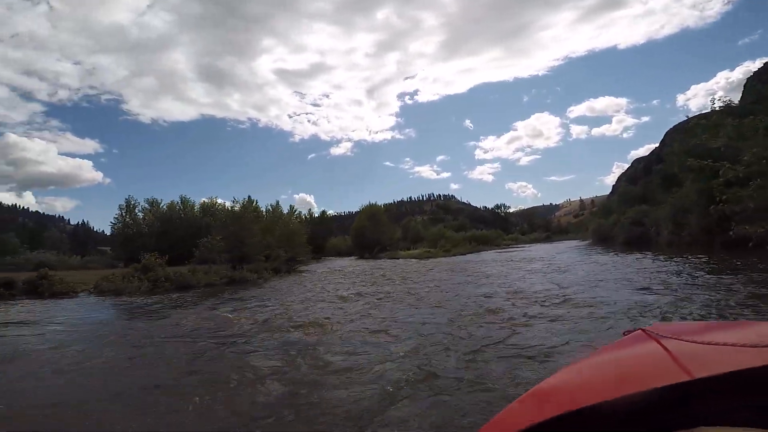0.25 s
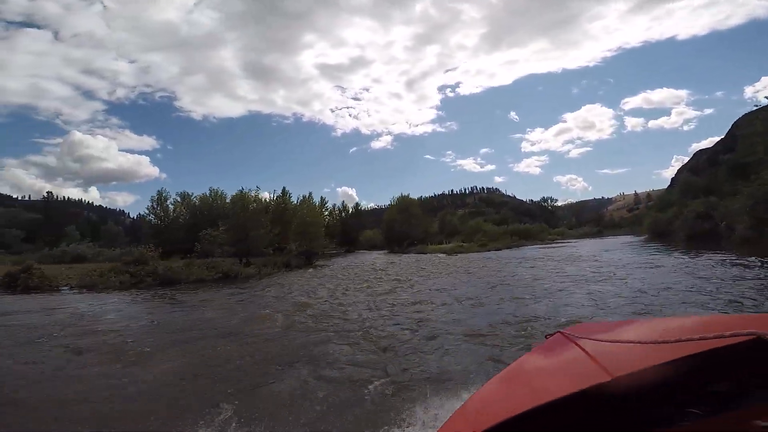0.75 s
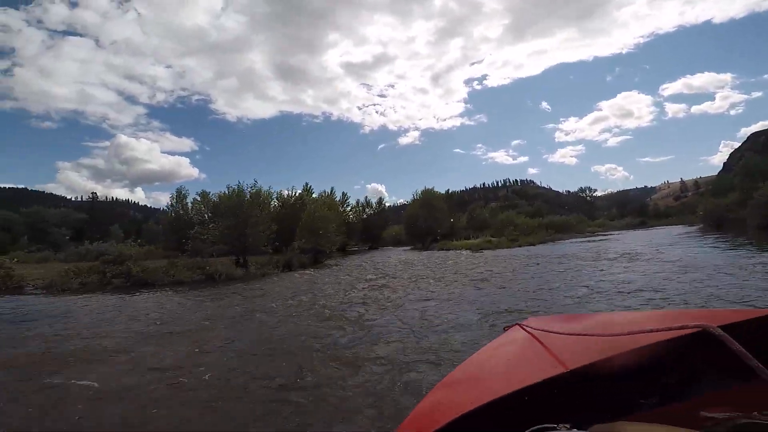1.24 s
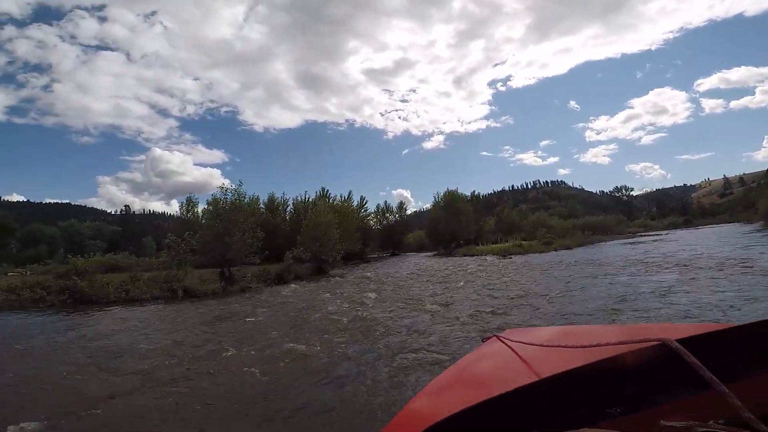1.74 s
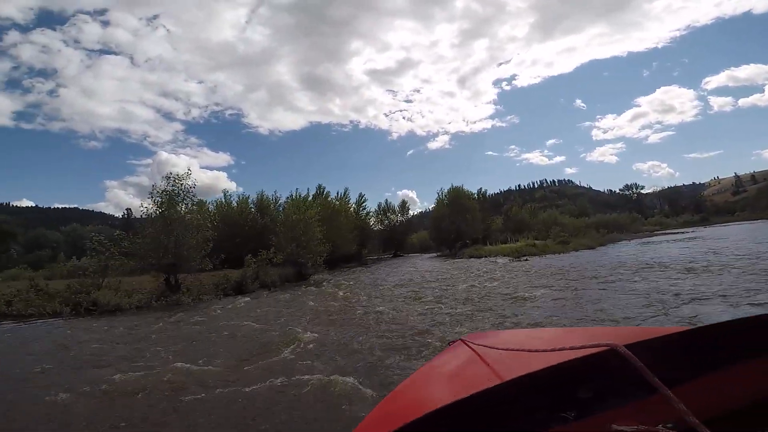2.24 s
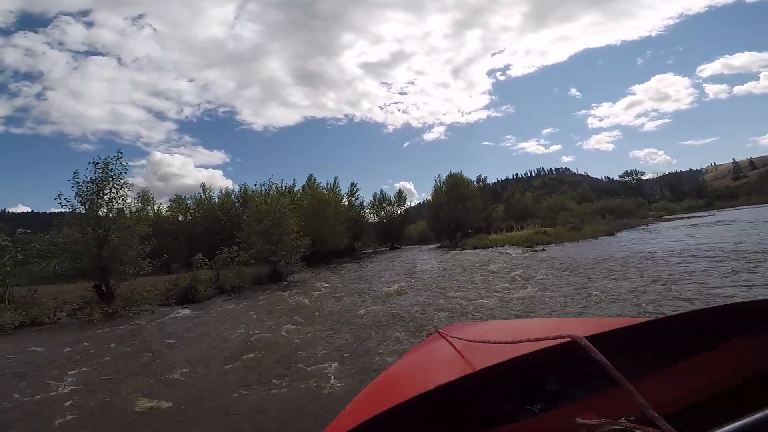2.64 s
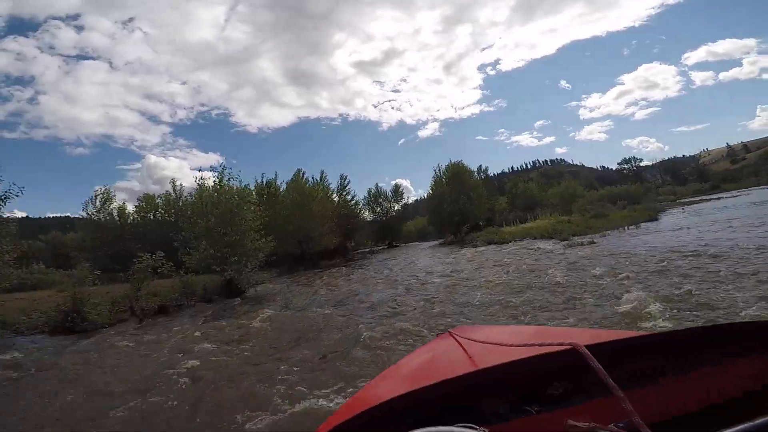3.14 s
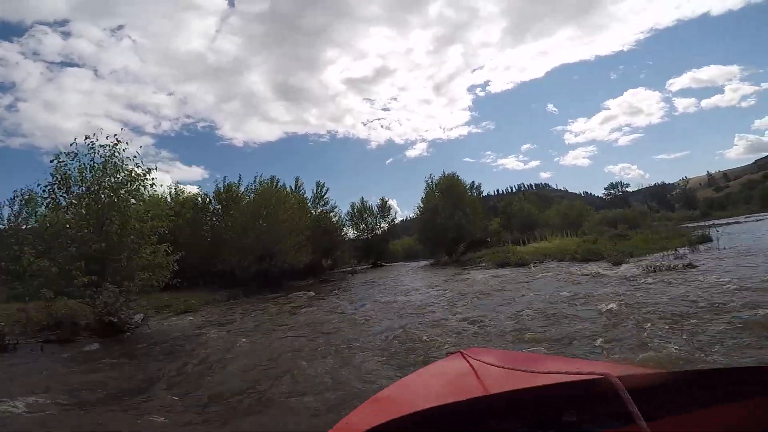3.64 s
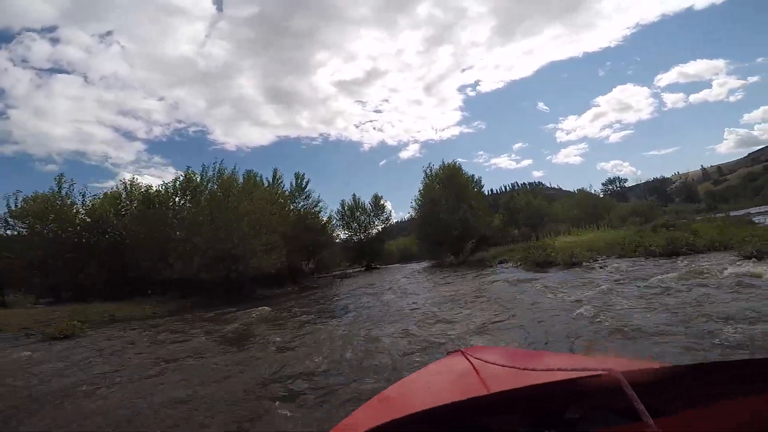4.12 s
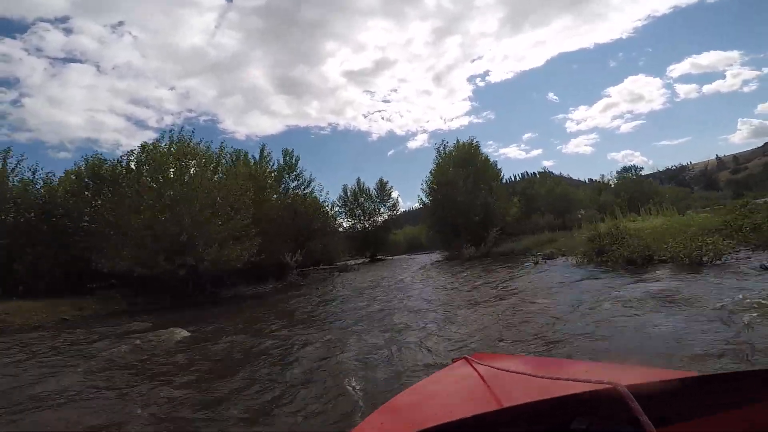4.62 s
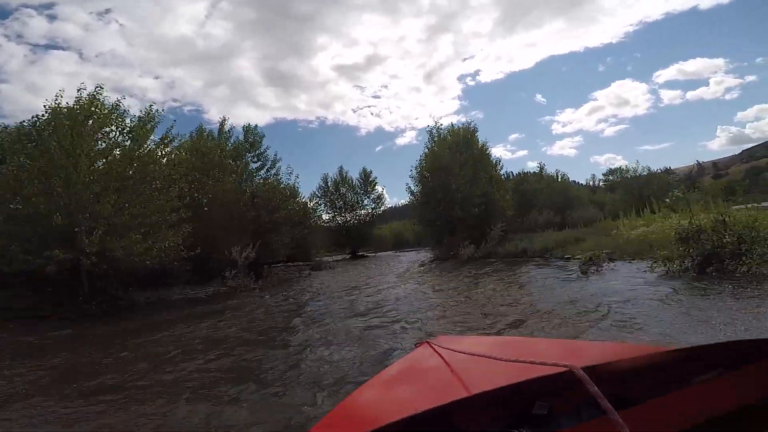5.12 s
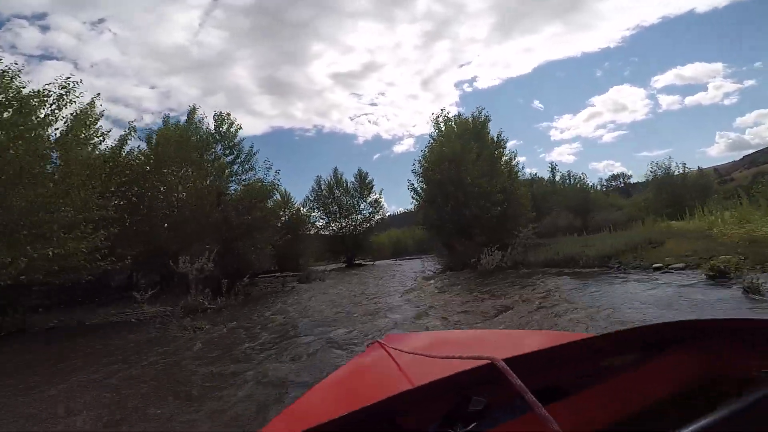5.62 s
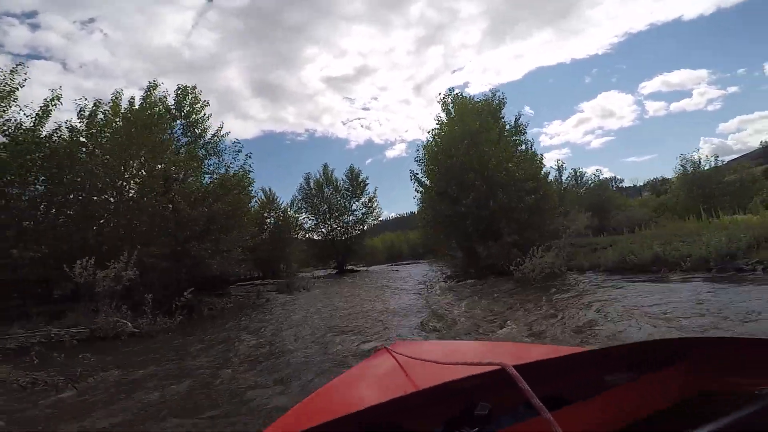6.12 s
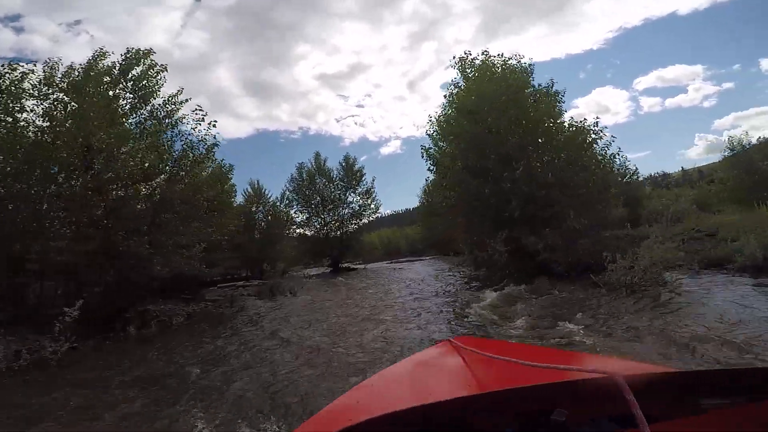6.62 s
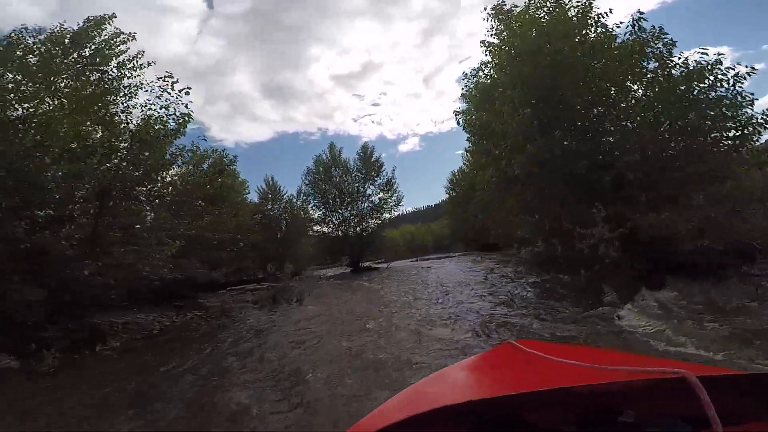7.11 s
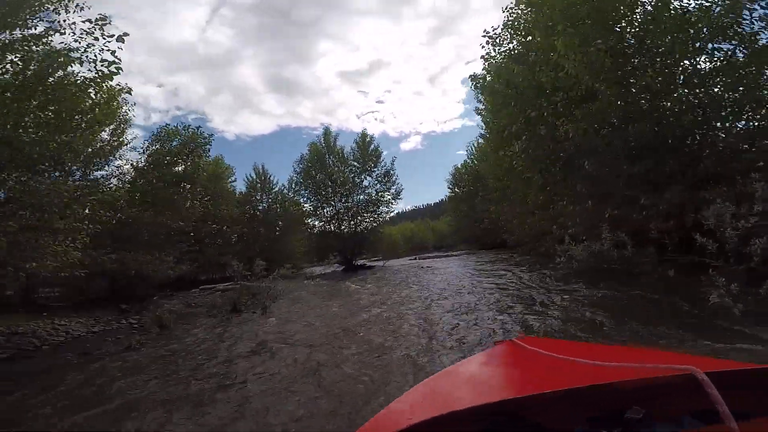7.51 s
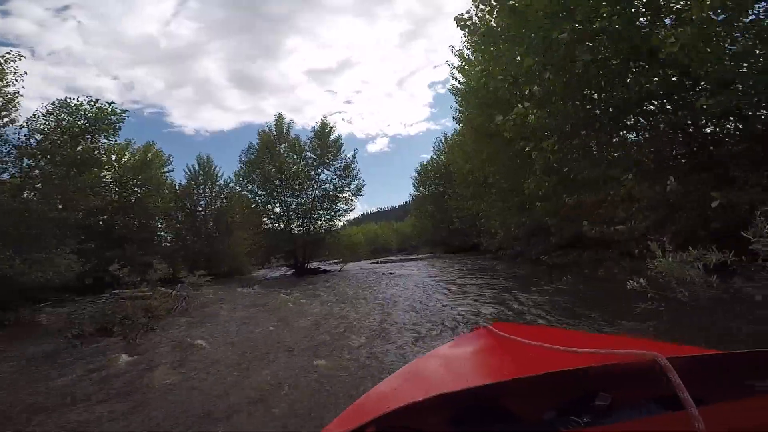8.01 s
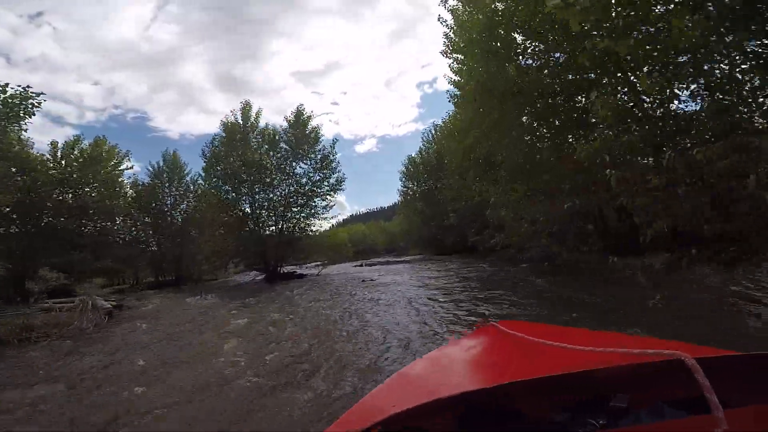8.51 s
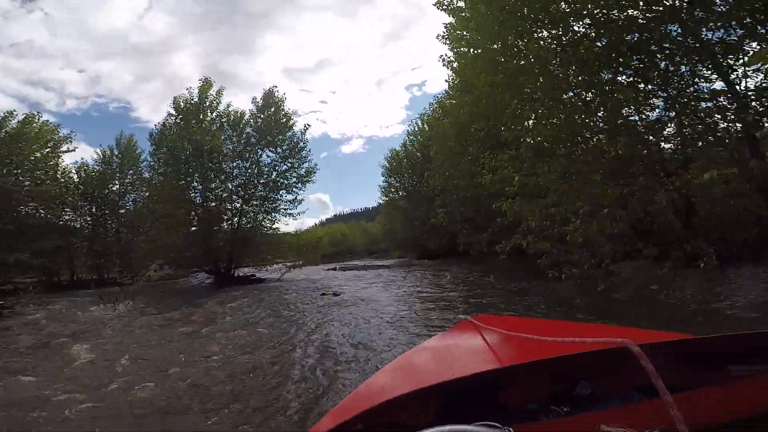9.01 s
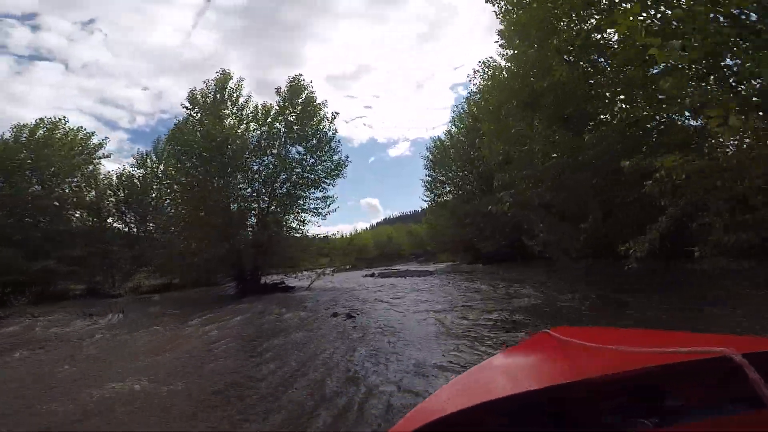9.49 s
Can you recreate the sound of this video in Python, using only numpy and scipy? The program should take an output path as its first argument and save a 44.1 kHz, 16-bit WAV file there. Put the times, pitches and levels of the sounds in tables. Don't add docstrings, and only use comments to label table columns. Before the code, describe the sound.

A small jet boat engine growls and whines with its throttle pumped up and down, over hull rumble, hissing spray, wind buffeting and a few wave thumps.

```python
import sys
import numpy as np
from scipy import signal
from scipy.fft import rfft, irfft, dct, next_fast_len
from scipy.io import wavfile
from scipy.ndimage import uniform_filter1d, minimum_filter1d

SR = 44100
rng = np.random.default_rng(int(sys.argv[2]) if len(sys.argv) > 2 else 0)


def boost_factor(decibels):
    exponent = np.asarray(decibels, float) / 20
    return 10 ** exponent


def put_to_file(sound):
    columns = np.atleast_2d(sound).T
    safe = np.clip(columns, -1, 1)
    whole_steps = np.round(safe * 32767)
    wavfile.write(sys.argv[1], SR, whole_steps.astype(np.int16))


N = 429960
TIME = np.arange(N) / SR
SIZE = next_fast_len(N)
HZ = np.fft.rfftfreq(SIZE, 1 / SR) + 1e-3


def rms_one(x):
    return x / np.sqrt(np.mean(x ** 2) + 1e-20)


def in_time(rows):
    return np.interp(TIME, *np.transpose(rows))


def at_hz(points, hz):
    f, value = np.transpose(points)
    return np.interp(np.log(hz), np.log(np.maximum(f, 1)), value)


def drift(rate):
    r = np.exp(-80 * np.pi * rate / SR)
    white = rng.standard_normal(N // 40 + 2002)
    slow = signal.lfilter([1], [1, -2 * r, r * r], white)[2000:]
    return np.interp(np.arange(N) / 40, np.arange(len(slow)), rms_one(slow))


def resonate(x, hz, width):
    r = np.exp(-np.pi * width / SR)
    top = np.array([1, 0, -1]) * (1 - r * r) / 2
    return signal.lfilter(top, [1, -2 * r * np.cos(2 * np.pi * hz / SR), r * r], x)


def patchy_noise(spectrum, patchy_db, rate, count):
    coloured = rfft(rng.standard_normal((3, SIZE))) * boost_factor(at_hz(spectrum, HZ))
    place = np.interp(np.log(HZ), np.log([spectrum[1][0], spectrum[-2][0]]), [0, count - 1])
    out, together = 0, drift(rate / 3)
    for k in range(count):
        band = np.sqrt(np.clip(1 - np.abs(place - k), 0, 1))
        flicker = boost_factor(patchy_db * (0.22 * together + drift(rate)))
        out = out + flicker * irfft(coloured * band, SIZE)[:, :N]
    return rms_one(out)


def swells(s, size, rise_s, fall_s):
    coarse = TIME[::40]
    gap = coarse[:, None] - s
    humps = np.exp(np.where(gap < 0, gap / rise_s, -gap / fall_s))
    return np.interp(TIME, coarse, humps @ size)


def lag(steps, seconds, start):
    r = np.exp(-1 / (seconds * SR))
    return start + signal.sosfilt([[1 - r, 0, 0, 1, -r, 0]] * 2, steps - start)


# start in seconds, firings per second the engine heads for.
THROTTLE = [(0, 142.7), (.25, 125), (.51, 148.1), (.74, 164.7), (1.21, 160.4), (1.62, 156.2), (2.08, 127.7),
            (2.36, 159.1), (2.54, 173.4), (2.82, 183.7), (3.18, 170.8), (3.41, 108.1), (3.7, 122.8),
            (4.22, 93.7), (4.51, 82.7), (4.85, 89.9), (5.08, 125.7), (6.18, 95.5), (6.54, 129.6),
            (6.74, 147.2), (7.02, 62.5), (7.52, 142), (7.78, 131), (8.0, 94), (8.31, 142.4), (8.56, 168.7),
            (8.96, 67.1), (9.46, 127.4)]
# load in dB, churn of water at the outlet in dB.
EFFORT = [(-2.5, 5.5), (-1.5, 1), (3, 1.8), (0, -2), (-3.5, -8), (-2, -2.5), (1.1, 0), (0.5, 2.5),
          (0, -0.5), (-1, -1), (-2, 5.5), (0.5, 4.5), (1, .1), (2.2, 4), (-5.5, -1.7), (-1, 1), (2, 1),
          (2.3, 2.9), (2, .1), (1, -1), (-2, -0.3), (3, 6.5), (-1, 4), (3, 1), (3, 1), (-1.5, 2.5), (-5, 0),
          (4, 5)]
START_PER_S, FLYWHEEL_S, LOAD_S = 70.6, .0877, 0.048


def throttle():
    s, aim = np.transpose(THROTTLE)
    load_db, churn_db = np.transpose(EFFORT)
    move = np.searchsorted(s, TIME, "right") - 1
    per_s = lag(aim[move], FLYWHEEL_S, START_PER_S)
    return per_s, lag(load_db[move], LOAD_S, load_db[0]), lag(churn_db[move], LOAD_S, churn_db[0])


# pitch in Hz, width in Hz, rms level in dB, sign.
EXHAUST = [(63, 58.5, -20, 1), (166.6, 30.7, -12.5, 1), (217.5, 17, -18.5, 1), (257.4, 16.1, -13, 1),
           (322.2, 6, -9, -1), (354.8, 18.3, -9.5, 1), (395, 10.4, -15, 1), (446.5, 86, -13.5, 1),
           (483.2, 16, -11.5, -1), (500.8, 4.8, -8.5, -1), (556.7, 28.4, -9, 1)]
MUFFLER_HZ = 461


def exhaust_gain(hz):
    grid = np.arange(20., 1000.)
    modes = 0
    for top_hz, width, db, sign in EXHAUST:
        modes = modes + np.sign(sign) * boost_factor(db) / (1 + 1j * (grid - top_hz ** 2 / grid) / width)
    muffler = np.sqrt(1 + (grid / MUFFLER_HZ) ** 12)
    return np.interp(hz, grid, np.abs(modes) / muffler)


ORDER_DB = [3.17, 0.66, -3, -5.5]
# multiple of firing rate, level against the rasp in dB.
WEAK_ORDERS = [(.5, 0), (1.5, 3.5), (2.5, 0.5), (3.5, -5.5), (4.5, -5.5), (5, -1), (5.5, -7.5), (6, -3.5),
               (6.5, -10), (7, -4.5), (7.5, -8.5), (8, -5), (8.5, -12), (9, -5), (10, -10.5)]
# frequency in Hz, level in dB.
PIPE = [(40, 1), (70, 1), (100, -5), (250, -4.5), (480, -8), (620, -5), (900, -7), (1150, -9), (1500, -16)]
FLUTTER_DB, UNEVEN_LOSS_DB = .5, 0.91


def engine(per_s, load_db, rasp_db, rumble_db):
    phase = 2 * np.pi * np.cumsum(per_s) / SR + 0.0073 * drift(28)
    rough = np.interp(rumble_db, [-32, -17], [.6, 3])
    rough = rough + np.clip(-np.gradient(per_s) * SR / 70, 0, 3)
    out = 0
    for k, level_db in enumerate(ORDER_DB, 1):
        flutter_db = rough * (FLUTTER_DB * drift(12.0) - UNEVEN_LOSS_DB)
        gain = np.sqrt(2) * exhaust_gain(k * per_s) * boost_factor(level_db + load_db + flutter_db)
        out = out - gain * np.cos(k * phase + 0.33 * rough * drift(5.35))
    for order, level_db in WEAK_ORDERS:
        gain = boost_factor(rasp_db + level_db + at_hz(PIPE, order * per_s) + 4.77 * drift(3.6))
        waver = 0.047 * rough ** 2 * np.sqrt(order) * drift(11)
        out = out + gain * np.cos(order * phase + waver + order ** 2)
    return 1.234 * out + 0.55 * hull_hold(out), phase


# pitch in Hz, width in Hz, level in dB.
HULL = [(70, 14, -12.5), (167.2, 49, 2), (258, 22, -2.5), (338.6, 45, -2), (409, 5.3, 1), (448.8, 14, 2.5)]


def hull_hold(tones):
    return sum((-1) ** k * resonate(tones, hz, 0.089 * width) for k, (hz, width, db) in enumerate(HULL))


def rumble(level_db):
    white = rng.standard_normal((3, N))
    rung = sum((-1) ** k * boost_factor(db) * resonate(white, hz, width) for k, (hz, width, db) in enumerate(HULL))
    low = signal.butter(4, 540, fs=SR, output="sos")
    return boost_factor(level_db) * rms_one(signal.sosfilt(low, rung))


# frequency in Hz, level in dB per Hz.
RASP = [(330, -35.5), (560, -9), (658, -10), (822, -9), (922, -11.5), (1150, -10.5), (1330, -13.5),
        (2800, -27), (3640, -46.5), (6160, -120)]
# pitch in Hz, width in Hz, level in dB.
COVERS = [(579, 29, 2.5), (826, 19, 4), (1003, 11, 5)]
# pitch in Hz, width in Hz.
PANEL = (1130, 26)


def rasp(level_db, panel_db, phase):
    puffs = patchy_noise(RASP, patchy_db=2.64, rate=1.8, count=4) * (1 + 0.095 * np.cos(phase))
    panel = rms_one(resonate(resonate(rng.standard_normal((3, N)), *PANEL), *PANEL))
    for hz, width, db in COVERS:
        puffs = puffs + boost_factor(db) * resonate(puffs, hz, width)
    return boost_factor(level_db) * puffs + boost_factor(panel_db + 1.5) * panel


# time in seconds, level in dB.
WASH = [(0.0, -44.5), (0.32, -48), (0.71, -43), (0.95, -46), (1.71, -48), (2.01, -46.5), (3.04, -48),
        (3.2, -49.5), (5.0, -43), (5.29, -45.5), (5.76, -44), (6.71, -46.5), (7.52, -40.5), (7.68, -45),
        (8.25, -44.5), (9.23, -45.5), (9.5, -41.5), (9.75, -44.5)]


def wash():
    return in_time(WASH)


# frequency in Hz, level in dB per Hz.
SPRAY = [(880, -34), (1500, -29), (2700, -12.5), (4810, -10), (5890, -8.5), (7640, -14.5), (9270, -24),
         (10300, -24.5), (11200, -32.5), (13100, -33), (15000, -49)]


def spray(level_db):
    return boost_factor(level_db) * patchy_noise(SPRAY, patchy_db=1.28, rate=20, count=5)


# time in seconds, level in dB.
GUST = [(0.0, -37.5), (0.35, -34.5), (0.43, -44.5), (0.51, -39), (0.81, -32.5), (1.19, -48.5), (2.61, -31),
        (2.63, -42.5), (4.5, -23.5), (5.21, -24), (5.57, -31), (5.7, -26.5), (7.74, -31), (8.01, -39.5),
        (8.28, -28.5), (8.72, -40.5), (9.2, -38), (9.75, -30)]


def gusts():
    return in_time(GUST)


# frequency in Hz, level in dB per Hz.
WIND = [(15, -23.5), (25, -24.5), (40, -10.5), (70, -6), (140, -9.5), (300, -19.5), (600, -32.5),
        (1200, -65.5), (4000, -120)]


def wind(level_db):
    shares = [[1.1], [2.0], [1.6]]
    return boost_factor(level_db + 5) * patchy_noise(WIND, patchy_db=2.2, rate=8, count=3) * shares


# time in seconds, peak level in dB.
RINGS = [(.3, -51), (0.799, -29.5), (1.3, -54), (2.85, -35.5), (4.864, -26.5), (5.0, -38), (5.079, -26),
         (5.63, -24.5), (5.74, -30), (6.03, -28), (6.48, -41), (6.97, -40), (7.679, -31), (8.78, -34),
         (9.33, -38), (9.6, -36.5), (9.7, -44)]
PANEL_REST_DB, RING_RISE_S, RING_FALL_S = -43, 0.04, 0.038


def panel_shake():
    s, db = np.transpose(RINGS)
    return 20 * np.log10(boost_factor(PANEL_REST_DB) + swells(s, boost_factor(db), RING_RISE_S, RING_FALL_S))


# time in seconds, rise in dB.
BARKS = [(.4, 3), (.78, 2), (1.9, 2), (2.62, 4.5), (3.08, 0), (4.33, 0), (4.55, 8), (5.12, 3), (5.26, 6.5),
         (5.87, 2.5), (6.2, 4), (6.4, 3.5), (6.98, 2.5), (8.63, 3.5), (8.75, 5), (8.93, 5.5), (9.59, -0.5)]
BARK_RISE_S, BARK_FALL_S = 0.035, 0.029


def barks():
    return swells(*np.transpose(BARKS), BARK_RISE_S, BARK_FALL_S)


DUCK_FROM_DB, DUCK_SHARE = -9.5, 0.33


def duck(tones):
    level_db = 10 * np.log10(uniform_filter1d(tones ** 2, size=SR // 25) + 1e-9)
    return boost_factor(-DUCK_SHARE * np.maximum(level_db - DUCK_FROM_DB, 0))


# time in seconds, peak level in dB, pitch in Hz.
THUMPS = [
    (3.251, -20, 75.5),
    (3.811, -8, 73),
    (4.628, -22.5, 94.8),
    (4.672, -16, 72.8),
    (5.296, -13.5, 112.6),
    (6.949, -12, 70.0),
]


def thumps():
    out = np.zeros(N)
    after = TIME[:SR // 4]
    shape = after / 0.015 * np.exp(-after / 0.021)
    for s, db, hz in THUMPS:
        at = round(s * SR)
        out[at:at + len(after)] += boost_factor(db + 5.5) * shape * np.sin(2 * np.pi * hz * after)
    return out


# time in seconds, peak level in dB.
SLAPS = [
    (4.2263, -39.5),
    (4.546, -26),
    (4.664, -21),
    (4.726, -35.5),
    (5.31, -41),
    (6.1134, -41),
]


def slaps():
    swell = np.zeros(N)
    for s, db in SLAPS:
        swell[round(s * SR)] = boost_factor(db + 6)
    fade = np.exp(-1 / (.012 * SR))
    swell = uniform_filter1d(signal.lfilter([1], [1, -fade], swell), size=132, origin=65)
    band = signal.butter(3, [500, 6000], "band", fs=SR, output="sos")
    splash = signal.sosfilt(band, rng.standard_normal((3, N)))
    return swell * (resonate(splash, 1100, 1800) + .25 * splash)


# time in seconds, share of two-port sound from 0 to 1.
OPEN = [
    (0, 0.2),
    (.15, 0.12),
    (.45, 0),
    (2.42, 0.01),
    (2.6, 0.47),
    (3.0, 0.92),
    (3.5, 1),
    (9.75, 0.98),
]


def opening():
    return np.clip(in_time(OPEN), 0, 1)


# frequency in Hz, left minus right in dB.
LEAN = [(60, 1.5), (110, 0.5), (200, -1.5), (370, -3.5), (690, -9.0), (1270, -8.5), (2340, -6.0),
        (4300, -4.0), (7910, -1.5), (14600, -1.5)]
# frequency in Hz, lead of the left in radians.
LEAD = [(0, 0), (520, -0.4), (950, -3.9), (1290, -4.3), (3100, -5.2), (4310, -6.0), (5080, -8.1),
        (6980, -9.1), (9390, -9.5), (10200, -9.7), (10900, -12.3), (12700, -12.6), (14700, -12.5)]
# frequency in Hz, common share from 0 to 1.
ALIKE = [(60, 0.42), (300, 0.84), (700, 0.52), (1500, 0.6), (3000, 0.15), (7000, 0.26), (14000, 0.093)]
# frequency in Hz, level in dB.
SHELTER = [(40, 1.5), (70, 10.5), (120, -1), (300, 4), (600, 1.5), (1200, 1.5), (2200, 6.5), (3200, 0.5),
           (5500, -4.5), (7000, -2), (9000, -5.5), (10300, -9.5), (11300, -38.5)]


def ports(tones, noises):
    alike = np.clip(at_hz(ALIKE, HZ), 0, 1)
    common, left, right = rfft(noises, SIZE)
    common = rfft(tones, SIZE) + np.sqrt(alike) * common
    lean = boost_factor(at_hz(LEAN, HZ) / 2)
    skew = np.exp(.5j * np.interp(HZ, *np.transpose(LEAD)))
    even = 2 / (lean + 1 / lean)
    pair = [even * lean * (common * skew + np.sqrt(1 - alike) * left),
            even / lean * (common / skew + np.sqrt(1 - alike) * right)]
    single = (common + np.sqrt((1 - alike) / 2) * left) * boost_factor(at_hz(SHELTER, HZ))
    opened = opening()
    return opened * irfft(pair, SIZE)[:, :N] + (1 - opened) * irfft(single, SIZE)[:N]


# frequency in Hz, threshold against the mean level in dB.
DROPOUT = [(1000, -24), (4000, -20), (6000, -14), (7300, -4), (8300, 0), (10800, 1), (12500, -1),
           (15000, 0)]


def empty_faint_lines(x, opened):
    hop, lead = 1024, 2016
    count = (N + lead) // hop + 1
    turn = np.array([[1, 0.96], [1, -1]]) / np.sqrt(2)
    padded = np.pad(turn @ x, ((0, 0), (lead, (count + 1) * hop - N - lead)), mode="reflect")
    window = np.sin(np.pi * (np.arange(2 * hop) + .5) / (2 * hop))
    frames = padded[:, np.arange(count)[:, None] * hop + np.arange(2 * hop)] * window
    a, b, c, d = np.split(frames, 4, axis=2)
    folded = np.concatenate([-c[..., ::-1] - d, a - b[..., ::-1]], axis=2)
    lines = dct(folded, type=4, norm="ortho")
    power = lines ** 2
    mean = np.sqrt(uniform_filter1d(np.mean(power, axis=1, keepdims=True), size=24, axis=2))
    now = np.sqrt(uniform_filter1d(uniform_filter1d(power, size=48, axis=2), size=5, axis=1) + 1e-20)
    nearby = np.sqrt(uniform_filter1d(power, size=5, axis=2) + 1e-20)
    strain = opened[np.clip(np.arange(count) * hop - hop, 0, N - 1)][:, None]
    line_hz = (np.arange(hop) + .5) * SR / (2 * hop)
    lines = lines * (nearby > np.sqrt(mean * now) * strain * boost_factor(at_hz(DROPOUT, line_hz)))
    p, q = np.split(dct(lines, type=4, norm="ortho"), 2, axis=2)
    first = np.concatenate([q, -q[..., ::-1]], axis=2) * window[:hop]
    second = np.concatenate([-p[..., ::-1], -p], axis=2) * window[hop:]
    joined = first[:, 1:] + second[:, :-1]
    return turn @ joined.reshape(2, -1)[:, lead - hop:lead - hop + N]


CRUISE_PER_S = 125
RUMBLE_DB, RUMBLE_GUST_SHARE, RUMBLE_DB_PER_OCTAVE = -21.5, 0.3, -4
RASP_DB, RASP_LOAD_SHARE, RASP_DB_PER_OCTAVE, RASP_OPEN_DB, RASP_WASH_SHARE = -32.5, 0.49, 3.5, 3, .6
SHAFT_DB = 2
OVERRUN_DB_PER_OCTAVE_S = 0.5
WIND_DB, WASH_DB = -2.2, 5.5


def scene():
    per_s, load_db, churn_db = throttle()
    gust_db, wash_db = gusts(), wash()
    octaves = np.log2(per_s / CRUISE_PER_S)
    rumble_db = RUMBLE_DB + churn_db + RUMBLE_DB_PER_OCTAVE * octaves
    rumble_db = rumble_db + RUMBLE_GUST_SHARE * (gust_db - gust_db.mean())
    rasp_db = RASP_DB + RASP_LOAD_SHARE * load_db + RASP_DB_PER_OCTAVE * octaves + RASP_OPEN_DB * opening()
    overrun_db = OVERRUN_DB_PER_OCTAVE_S * np.minimum(np.gradient(octaves) * SR, 0)
    tones, phase = engine(per_s, load_db + overrun_db, rasp_db + SHAFT_DB, rumble_db)
    rasp_db = rasp_db + RASP_WASH_SHARE * (wash_db - wash_db.mean()) + barks()
    hiss = rasp(rasp_db, panel_shake(), phase) + spray(wash_db + WASH_DB) + slaps()
    noises = rumble(rumble_db) + wind(gust_db + WIND_DB) + duck(tones) * hiss
    return ports(tones + thumps(), noises)


def band_limit(x):
    return signal.sosfilt(signal.butter(12, 15170, fs=SR, output="sos"), x)


PREAMP_HISS_DB, PREAMP_HISS_HZ = -57.5, 11700


def record(dry):
    high = signal.butter(10, PREAMP_HISS_HZ, "high", fs=SR, output="sos")
    opened = opening()
    hiss = resonate(signal.sosfilt(high, rng.standard_normal((2, N))), 12600, 3000)
    x = dry + boost_factor(PREAMP_HISS_DB - 7 * opened) * hiss
    wanted = np.minimum(1, .93 / (np.abs(x).max(axis=0) + 1e-9))
    gain = uniform_filter1d(minimum_filter1d(wanted, size=661), size=441)
    gain = gain * np.minimum(1, (TIME[-1] - TIME) / .003)
    mix = empty_faint_lines(x * gain, opened)
    return band_limit(mix)


dry = scene()
out = record(dry)
put_to_file(out)
```